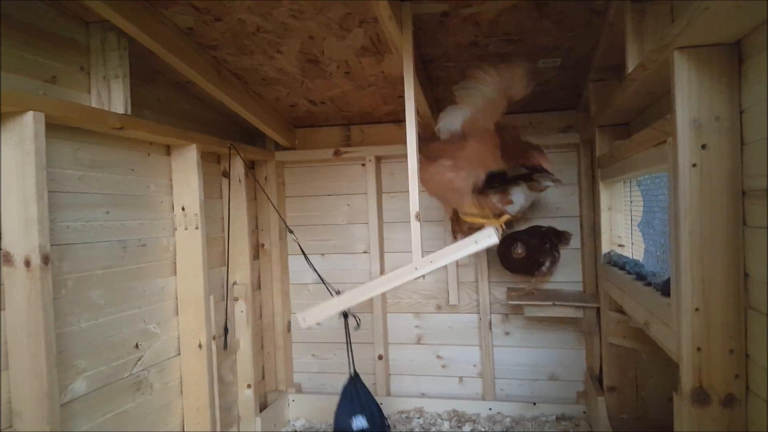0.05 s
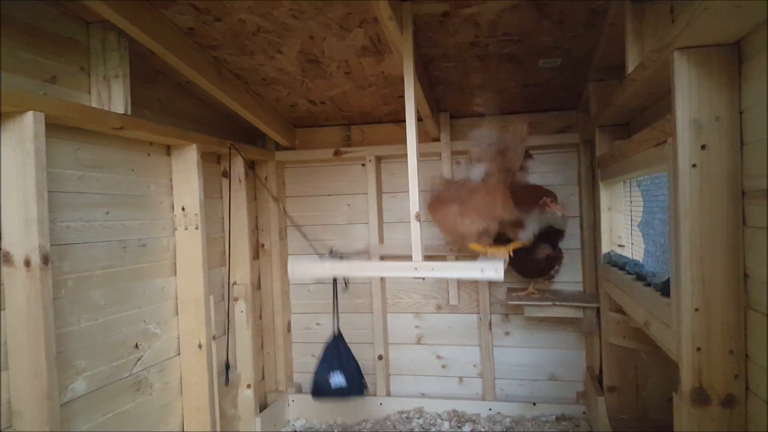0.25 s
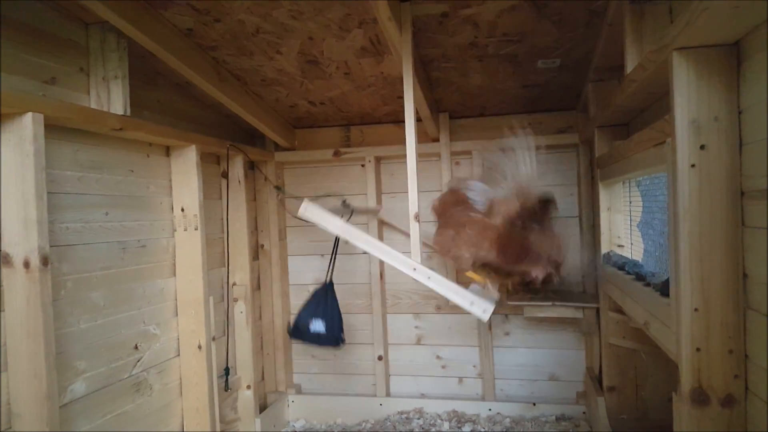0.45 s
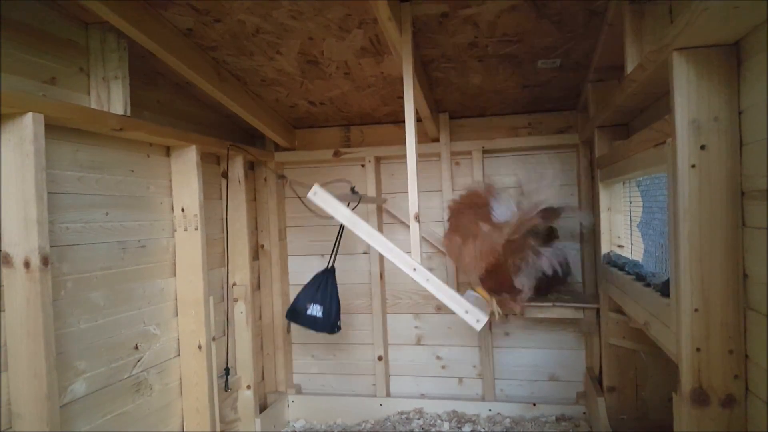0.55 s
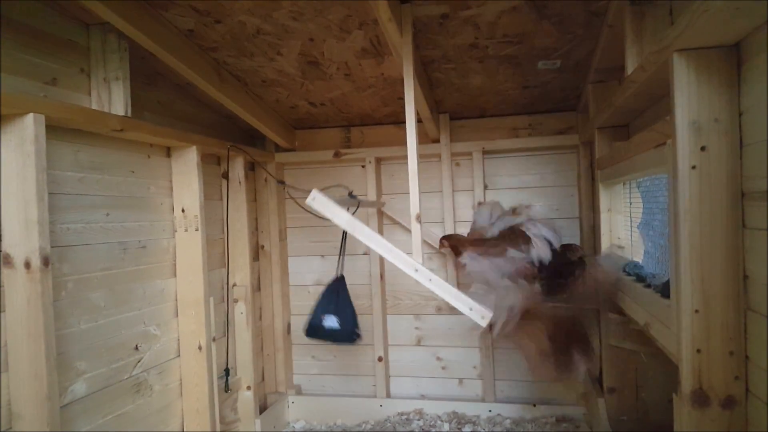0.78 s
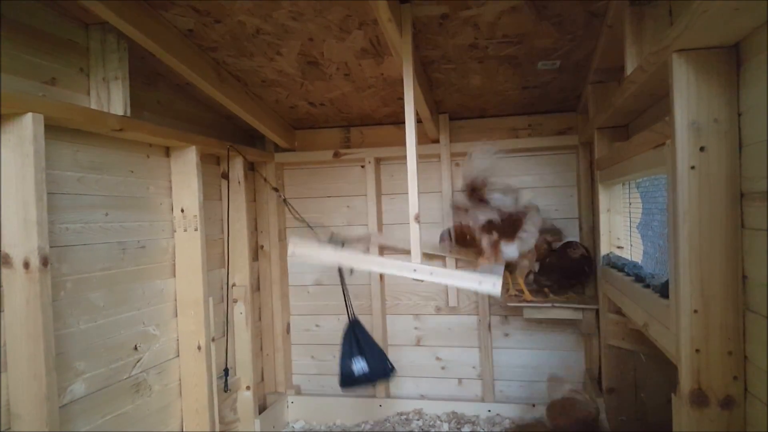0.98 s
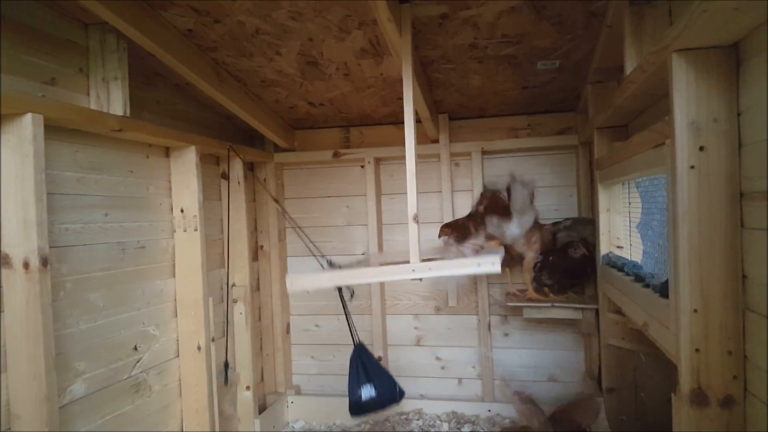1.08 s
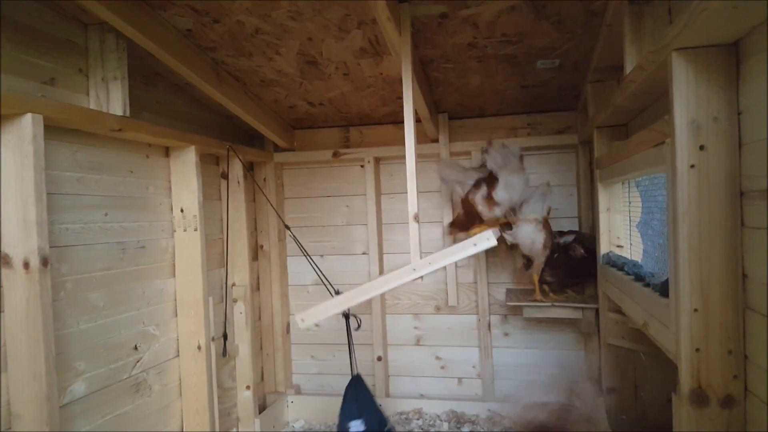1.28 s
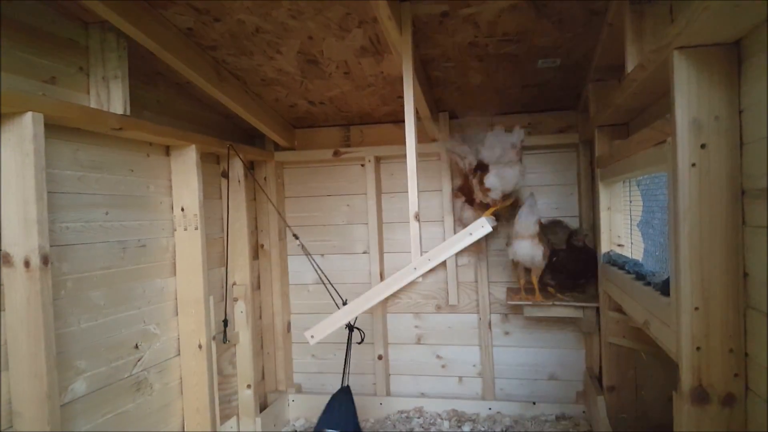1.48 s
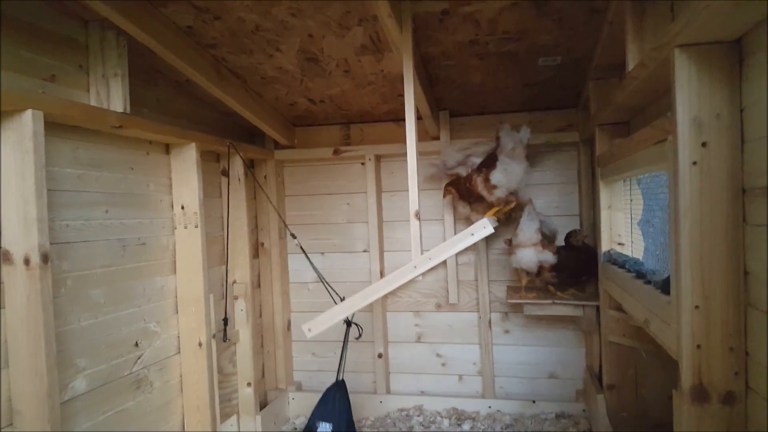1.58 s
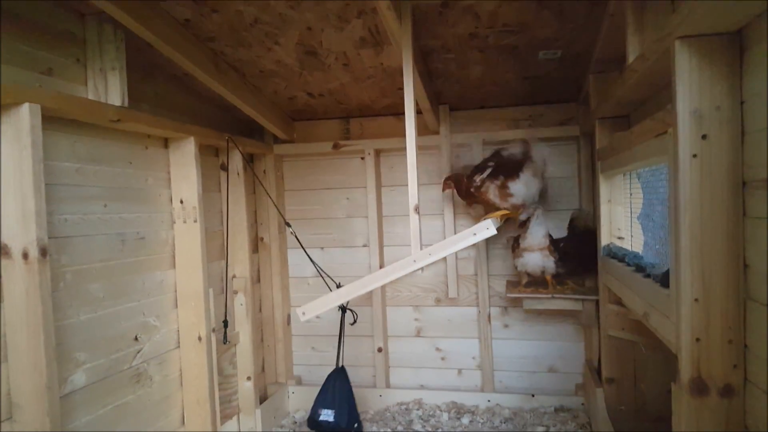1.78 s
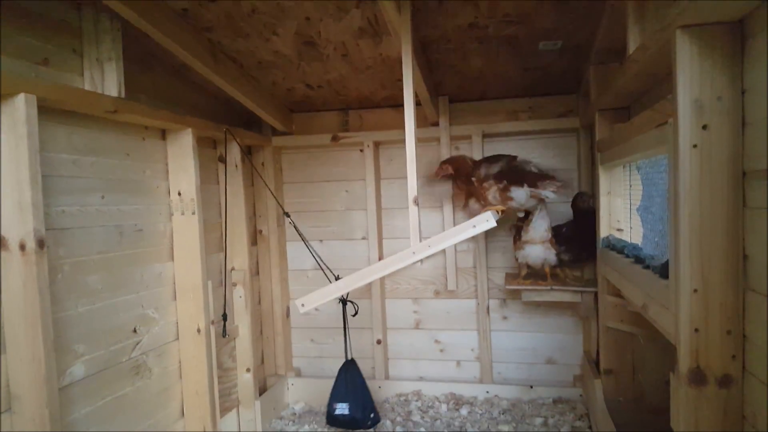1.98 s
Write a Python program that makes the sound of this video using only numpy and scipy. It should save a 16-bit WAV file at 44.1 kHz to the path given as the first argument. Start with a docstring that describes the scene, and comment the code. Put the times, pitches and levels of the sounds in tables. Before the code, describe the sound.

Chickens flap and scramble on a wooden perch, heard close in a small plank coop with a short echo. Light knocks build to a sharp one at 0.4 seconds. Wings slap, feathers rustle and claws scrabble, with low landing thumps near 0.6 and 1 second and another knock at 1.2. A foot drags from 1.4, a last thump lands at 1.7, and the scuffle eases by 2 seconds.

```python
"""Inside a small plank coop, chickens scramble and flap on a tilting wooden perch.
Feet knock, scuff and slip on the wood, bodies land with low thumps, wings slap and swish.
Between the blows feathers rustle, claws scrabble, a foot drags and the wings stir the air.
The close walls answer with dense reflections and a short tail."""
import sys
import numpy as np
from scipy import signal
from scipy.fft import rfft, irfft, next_fast_len
from scipy.io import wavfile

SR = 44100
rng = np.random.default_rng(int(sys.argv[2]) if len(sys.argv) > 2 else 0)


def transcribe(u):
    """Save the signal u as a 16-bit wav file named by the first command-line argument.

    u: samples, shape (n,) or (channels, n), limited to [-1, 1]; the rate is SR.
    q: integer samples, one column per channel.
    """
    v = np.clip(np.atleast_2d(u).T, -1, 1)
    q = np.round(v * 32767).astype(np.int16)
    wavfile.write(sys.argv[1], SR, q)


N = 90404
BLOW_T = np.arange(SR // 5) / SR   # time axis of one blow, s
BAND_EDGES = np.geomspace(22, 18000, 25)   # Hz
BAND_HZ = np.sqrt(BAND_EDGES[1:] * BAND_EDGES[:-1])
BAND_FILTERS = [signal.butter(2, edges, "band", fs=SR, output="sos")
                for edges in zip(BAND_EDGES, BAND_EDGES[1:])]
LEFT_RIGHT = np.array([[1], [-1]])
CLAW_GRAIN = dict(per_s=450, size_db=-0.8, fall_s=0.011)

# stereo lean of the coop: f/Hz, left minus right/dB
BALANCE = [(60, 1.5), (200, 2), (700, 1.1), (1500, 2.5), (2500, 0), (4000, -5.5), (9000, -2.5), (15000, -4)]


def knocks():
    """A foot strikes and scuffs, shaking the planks and ringing the timber of the perch."""
    # foot and perch hits: t/s, level/dB, low-pass/Hz, high-pass/Hz, scuff decay/s
    hits = [(.037, -44, 1050, 300, 0.0085), (0.122, -39.5, 894, 397, 0.0097),
            (0.149, -36.5, 600, 222, 0.029), (.209, -38, 800, 196, .014), (.24, -31, 1710, 380, .003),
            (0.253, -33.5, 546, 400, 0.0023), (.327, -23, 1670, 200, 0.0096),
            (0.349, -25, 1240, 220, 0.013), (0.412, -24.5, 1330, 490, 0.001),
            (.418, -14.5, 650, 190, 0.0035), (0.428, -23.5, 696, 242, 0.0017),
            (0.509, -29, 1770, 398, 0.002), (0.61, -32, 650, 298, 0.0085), (0.64, -21.5, 1470, 257, 0.022),
            (0.773, -27.5, 850, 400, 0.011), (0.856, -23, 1470, 197, 0.0079),
            (0.889, -30, 890, 400, 0.0045), (0.947, -32, 1340, 590, 0.0027), (1.041, -30, 1760, 590, 0.012),
            (1.087, -33, 1620, 490, .008), (1.106, -41, 1610, 795, 0.006),
            (1.167, -32.5, 1820, 350, 0.0048), (1.1995, -15, 1000, 330, 0.0025),
            (1.211, -20, 690, 450, .003), (1.427, -35.5, 1080, 400, 0.01), (1.538, -31, 1000, 496, 0.0076),
            (1.632, -35.5, 1530, 450, 0.0022), (1.724, -23, 1390, 198, 0.0058),
            (1.747, -35.5, 550, 280, 0.0032), (1.922, -41.5, 1800, 603, 0.0033),
            (1.966, -49.5, 1500, 705, 0.0076), (2.026, -31.5, 2040, 630, 0.0057)]
    # colour of a knock spread through the planks: f/Hz, level/dB
    plank_colour = [(100, -7), (215, 1), (400, 1), (600, 0), (820, -1), (1050, -4), (1400, -3.5),
                    (2200, -2.5), (3200, -4), (6000, -14)]
    # timber modes: f/Hz, level/dB, t60/s
    modes = [(220, -20, 0.28), (299, -24.5, 0.3), (384.6, -6, 0.34), (490, -14, .1), (577.5, 1.5, 0.18),
             (637, 7.5, 0.15), (787.4, -1, 0.16), (926, 7.5, 0.13), (1113, -3, 0.05), (1346, -2, 0.17),
             (1580, -5, 0.1), (1967, -33, 0.082), (2250, -65, .07), (2750, 1, .06)]
    scuffs_per_s, scuff_db, ring_db = 1300, -1, -8
    out, t = np.zeros((2, N)), BLOW_T
    size = next_fast_len(2 * len(t))
    echo_energy = rfft([wall_decay(t, hz) ** 2 for hz in BAND_HZ], size)
    for s, db, bright_hz, bass_hz, scuff_s in hits:
        scuff = ticks(len(t), scuffs_per_s, size_db=1.54) * np.sqrt(scuffs_per_s / SR)
        contact = scuff * from_db(scuff_db) * np.exp(-t / scuff_s)
        contact[0] += 1   # the strike itself
        # the walls smear the contact's energy, band by band
        energy = irfft(echo_energy * rfft(contact ** 2, size), size)[:, :len(t)]
        planks = sum(rms_one(noise * swell) * np.sqrt(hz) * from_db(at_hz(plank_colour, hz))
                     for swell, (hz, noise) in zip(np.sqrt(np.abs(energy)), stereo_bands(len(t))))
        ring = sum(rng.choice([-1, 1]) * from_db(mode_db + rng.normal(0, 2) - 60 * t / t60)
                   * np.sin(2 * np.pi * hz * t) for hz, mode_db, t60 in modes)
        knock = rms_one(planks) + from_db(ring_db) * rms_one(ring)
        knock = cut(knock, bright_hz, "low", order=3)
        add(out, s, blow(cut(knock, bass_hz, "high"), db))
    return out


def thumps():
    """A soft, heavy landing swings the boards for a few cycles."""
    # landings on perch and shelf: t/s, level/dB, f/Hz, rise/s, decay/s, overtone/dB
    landings = [(.24, -33, 85, .012, .05, -10), (.418, -17.5, 207.6, 0.0037, 0.023, -3),
                (.424, -21, 69.6, 0.0044, 0.017, -11), (.607, -8.5, 183, .004, 0.011, -26),
                (.857, -18.5, 132.7, 0.004, 0.015, 3.5), (.978, -1.5, 212.7, 0.011, .012, -26),
                (1.027, -18, 190, 0.0086, 0.017, -16), (1.093, -21, 172.6, 0.007, 0.019, -9),
                (1.2, -16, 219, 0.0051, 0.024, -3), (1.51, -27, 147.6, 0.0055, 0.041, -7.5),
                (1.725, -10.5, 114.3, 0.0021, 0.017, -4), (1.728, -13, 225, 0.0042, .024, -20),
                (1.748, -15, 113, 0.0026, 0.01, -0.5), (1.932, -25, 235, 0.0015, 0.0056, -12),
                (1.949, -29.5, 85, 0.0035, 0.019, -24)]
    overtone_ratio, overtone_fall_ratio, room_db = 2.33, .8, -7.5
    out, t = np.zeros((2, N)), BLOW_T
    for s, db, hz, rise_s, fall_s, overtone_db in landings:
        body = np.sin(2 * np.pi * hz * t) * np.exp(-t / fall_s)
        overtone = np.sin(2 * np.pi * hz * overtone_ratio * t)
        overtone *= from_db(overtone_db) * np.exp(-t / (fall_s * overtone_fall_ratio))
        attack = 1 - np.exp(-(t / rise_s) ** 2)
        swing = cut((body + overtone) * attack * from_db(db), hz=57, kind="high")
        add(out, s, swing * pan(hz))
        add(out, s, from_db(room_db) * coop(swing))
    return out


def wings():
    """Each stroke is a quick swell of barb clicks from a fan of feathers, direct and off the walls."""
    # slaps and swishes: t/s, level/dB, low-pass/Hz, rise/s, decay/s
    strokes = [(.031, -45.5, 14000, 0.015, 0.011), (0.217, -41, 7840, 0.0026, 0.025),
               (.236, -33, 2880, 0.0023, 0.0098), (.328, -46.5, 2780, .002, 0.0056),
               (.413, -41, 4000, 0.0026, 0.0077), (0.506, -41, 4100, .01, .012),
               (.604, -41, 12000, 0.0034, 0.0068), (0.642, -32, 4940, .006, .009),
               (0.752, -28.5, 13300, 0.0045, 0.031), (0.789, -36, 10000, 0.0027, 0.0076),
               (.854, -23, 9100, 0.0054, 0.01), (0.886, -35.5, 7000, 0.0039, 0.012),
               (0.997, -40, 8000, .004, 0.013), (1.036, -38, 6000, .004, 0.013),
               (1.166, -42.5, 5000, .003, 0.012), (1.477, -41, 10000, 0.0043, 0.02),
               (1.528, -37, 12000, 0.0055, 0.033), (1.628, -33.5, 8900, 0.0016, 0.011),
               (1.724, -35, 9000, .002, 0.0071), (1.931, -42, 9000, .003, 0.0076),
               (1.974, -45, 8000, 0.0051, 0.011), (2.029, -56, 2200, 0.0026, 0.0055)]
    # colour of a stroke: f/Hz, level/dB
    stroke_colour = [(300, -27), (900, 6), (1800, 4), (3200, 3), (5000, 0), (7200, -1), (8500, 2),
                     (10000, -8.5), (16000, -3.5)]
    room_db = -11.5
    out, t = np.zeros((2, N)), BLOW_T
    hz = np.fft.rfftfreq(len(t), 1 / SR)
    colour = from_db(at_hz(stroke_colour, hz)) * pan(hz)
    for s, db, bright_hz, rise_s, fall_s in strokes:
        rolloff = 1 / np.sqrt(1 + (hz / bright_hz) ** 2)
        fan = irfft(rfft([barbs(len(t)), barbs(len(t))]) * colour * rolloff, len(t))
        swell = np.minimum(t / rise_s, 1) * np.exp(-np.maximum(t - rise_s, 0) / fall_s)
        add(out, s, blow(fan * swell, db))
    return out + from_db(room_db) * coop(out.sum(0) / np.sqrt(2))[:, :N]


def barbs(size):
    """Feather barbs flick past each other over a soft hiss."""
    return ticks(size, per_s=6400, size_db=3.5) + 0.4 * rng.standard_normal(size)


def slips():
    """A claw slips: a swell of tiny catches makes one resonance of the perch sing briefly."""
    # claw squeaks: t/s, relative level/dB, f/Hz, length/s
    squeaks = [(0.234, -34, 1850, .012), (.484, -31, 1120, 0.027), (0.931, -32.5, 1124, .034),
               (1.088, -36.5, 1430, 0.034), (1.426, -34.5, 900, 0.038), (1.537, -30.5, 620, 0.025),
               (1.963, -43, 940, 0.023), (2.026, -33.5, 930, 0.017)]
    width_hz, room_db = 110, -2.5
    out, t = np.zeros((2, N)), BLOW_T
    for s, db, hz, length_s in squeaks:
        swell = np.sin(np.pi * np.minimum(t / length_s, 1))
        catches = ticks(len(t), per_s=1800, size_db=1) * swell
        add(out, s, blow(resonate(catches, hz, q=hz / width_hz), db))
    return (out + from_db(room_db) * coop(out[0])[:, :N]) / np.sqrt(2)


def rustle():
    """Plumage rubs in a fine, bright stream of tiny contacts."""
    # feather colour: f/Hz, level/dB
    colour = [(500, -11), (1500, 3.5), (3000, 2), (5000, 0.5), (7200, 0.5), (8500, -1.5), (10000, -6),
              (12000, -11), (16000, -8)]
    # swells of rubbing: t/s, level/dB
    swells = [(0, -58), (.2, -58.5), (.3, -57), (.4, -52.5), (.44, -37.5), (.49, -49), (.545, -44),
              (.6, -32.5), (.67, -35), (.735, -42), (.84, -42), (.9, -38), (.97, -44), (1.06, -42),
              (1.12, -54), (1.2, -44.5), (1.3, -45.5), (1.45, -44), (1.61, -43), (1.68, -31.5), (1.73, -37),
              (1.82, -46.5), (2.05, -50)]
    return grains(colour, per_s=900, size_db=-0.5, fall_s=0.0078) * fader(swells)


def scrabble():
    """Claws tick on the boards in dull, woody flurries."""
    # colour of claws on boards: f/Hz, level/dB
    colour = [(200, -26), (400, 5.5), (620, 0.5), (830, 1), (1300, -7.5), (2000, -8), (2700, -15),
              (3600, -18), (8000, -45)]
    # flurries: t/s, level/dB
    flurries = [(0, -53), (.12, -44), (.3, -46), (.52, -35), (.66, -34), (.74, -40), (.8, -32),
                (.84, -35.5), (.92, -33), (1.0, -37), (1.14, -64), (1.33, -42), (1.46, -38), (1.56, -38),
                (1.61, -39), (1.71, -37.5), (1.84, -48), (2.05, -50.5)]
    return grains(colour, **CLAW_GRAIN) * fader(flurries)


def drag():
    """A foot drags along the perch with a grainy rasp."""
    # rasp colour: f/Hz, level/dB
    colour = [(500, -15), (1100, -2), (1700, 2.5), (2600, 6.5), (3300, -7), (6000, -27)]
    # course of the drag: t/s, level/dB
    course = [(1.15, -80), (1.3, -60.5), (1.4, -40.5), (1.5, -41), (1.57, -35), (1.62, -40), (1.7, -38.5),
              (1.8, -57), (1.9, -49.5), (2.05, -51)]
    return grains(colour, **CLAW_GRAIN) * fader(course)


def air():
    """Beating wings push a low, fluttering rush of air."""
    # colour of the rush: f/Hz, level/dB
    colour = [(25, -19), (50, -12.5), (82, 0), (105, -2.5), (170, 1.5), (230, 1.5), (330, -8.5),
              (600, -18.5), (1200, -37), (4000, -65)]
    # gusts: t/s, level/dB
    gusts = [(0, -49.5), (.12, -38.5), (.24, -37), (.3, -37.5), (.37, -28.5), (.48, -29), (.57, -33),
             (.68, -33), (.76, -35.5), (.88, -29.5), (.95, -35.5), (1.1, -30.5), (1.25, -33), (1.34, -40),
             (1.4, -33.5), (1.55, -36), (1.68, -41), (1.8, -39), (1.88, -46.5), (1.95, -37), (2.01, -56),
             (2.05, -30.5)]
    flutter_db, flutter_hz = 2.6, 39
    flutter = rms_one(cut(rng.standard_normal(N + SR), flutter_hz, "low")[SR:])
    return rms_one(coloured(colour) * from_db(flutter_db * flutter)) * fader(gusts)


def coop(x, length_s=.16):
    """Stereo echo of x off the close walls, with a fresh pattern of reflections on each call."""
    t = np.arange(int(length_s * SR)) / SR
    echo = sum(rms_one(noise * wall_decay(t, hz)) * np.sqrt(hz) for hz, noise in stereo_bands(len(t)))
    return signal.fftconvolve(x[None], rms_one(echo) / np.sqrt(len(t)), axes=1)


def wall_decay(t, hz):
    """The walls answer a click in one band: reflections build up, hold, drop and leave a tail."""
    # decay curve of the first reflections: f/Hz, t60/s
    early_t60 = [(100, 0.21), (500, 0.06), (1500, -0.0053), (4000, 0.2369), (12000, 0.1147)]
    # reverb tail: f/Hz, level/dB
    tail_colour = [(150, -8), (600, -15.5), (1500, -8), (4000, -16.5), (12000, -46)]
    build_up_s, hold_shape, tail_t60_s = 0.00069, 1.73, 0.27
    early = from_db(-60 * (t / at_hz(early_t60, hz)) ** hold_shape)
    tail = from_db(at_hz(tail_colour, hz) - 60 * t / tail_t60_s)
    return (early + tail) * (1 - np.exp(-t / build_up_s))


def stereo_bands(size):
    """Yield (centre Hz, noise) for each band, with the coop's stereo width and lean."""
    # likeness of the channels: f/Hz, correlation (1 or more is mono)
    likeness = [(60, 1.3), (170, 0.9), (350, 0.8), (700, 0.7), (1400, -0.24), (2800, -0.26), (6000, 0),
                (14000, 0)]
    white = rng.standard_normal((2, 2, size + SR // 30))
    for k, (hz, sos) in enumerate(zip(BAND_HZ, BAND_FILTERS)):
        mid, side = signal.sosfilt(sos, white[k % 2])[:, -size:]
        alike = np.clip(at_hz(likeness, hz), -1, 1)
        yield hz, (np.sqrt(1 + alike) * mid + np.sqrt(1 - alike) * side * LEFT_RIGHT) * pan(hz)


def grains(colour, per_s, size_db, fall_s):
    """Tiny random contacts, each smeared by the walls into a short dying puff; rms 1."""
    contacts = ticks(N + SR, per_s, size_db)
    energy = signal.lfilter([1], [1, -np.exp(-2 / (fall_s * SR))], contacts ** 2 + 1e-12)[SR:]
    return rms_one(coloured(colour) * np.sqrt(energy))


def coloured(colour):
    """Diffuse stereo noise of that colour; rms 1."""
    return rms_one(sum(rms_one(noise) * np.sqrt(hz) * from_db(at_hz(colour, hz))
                       for hz, noise in stereo_bands(N)))


def ticks(size, per_s, size_db):
    """Random clicks whose sizes scatter by size_db; rms 1."""
    sizes = from_db(size_db * np.minimum(rng.exponential(1, size), 4)) * rng.choice([-1, 1], size)
    return rms_one(sizes * (rng.random(size) < per_s / SR))


def blow(x, db, window_s=.03):
    """Give a short sound the energy of that level held for window_s."""
    return from_db(db) * rms_one(x) * np.sqrt(window_s * SR / x.shape[-1])


def pan(hz):
    """Left and right gains of the coop at that frequency."""
    return from_db(LEFT_RIGHT * at_hz(BALANCE, hz) / 2)


def fader(points):
    """Gain over time from rows of t/s, level/dB."""
    return from_db(np.interp(np.arange(N) / SR, *np.transpose(points)))


def at_hz(points, hz):
    """Read a table on a log-frequency axis."""
    f, value = np.transpose(points)
    return np.interp(np.log(np.maximum(hz, 1)), np.log(f), value)


def cut(x, hz, kind, order=2):
    """Butterworth low- or high-pass."""
    return signal.sosfilt(signal.butter(order, hz, kind, fs=SR, output="sos"), x)


def resonate(x, hz, q):
    """Ring one narrow resonance."""
    return signal.lfilter(*signal.iirpeak(hz, q, fs=SR), x)


def from_db(db):
    """Decibels to gain."""
    return 10 ** (np.asarray(db) / 20)


def rms_one(x):
    """Scale to rms 1."""
    return x / np.sqrt(np.mean(x ** 2) + 1e-20)


def add(out, s, x):
    """Mix x in at time s."""
    start = int(s * SR)
    out[:, start:start + x.shape[-1]] += x[..., :max(N - start, 0)]


def scene():
    """Everything in the coop, in stereo."""
    return knocks() + thumps() + slips() + wings() + rustle() + scrabble() + drag() + air()


def record(dry):
    """The microphone lifts a narrow band of the treble; the top is cut steeply."""
    lift_gain, cutoff_hz = 0.58, 15750
    lifted = dry + lift_gain * resonate(dry, hz=8490, q=24)
    return signal.sosfilt(signal.ellip(12, .1, 90, cutoff_hz, fs=SR, output="sos"), lifted)


dry = scene()
out = record(dry)
transcribe(out)
```